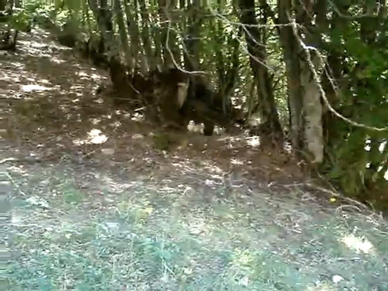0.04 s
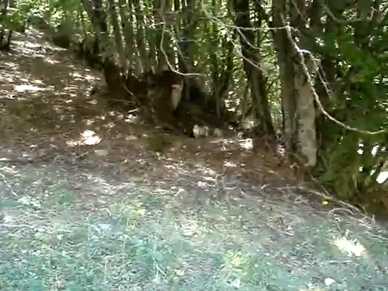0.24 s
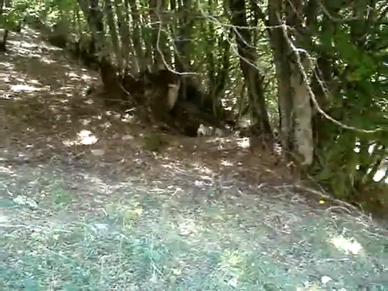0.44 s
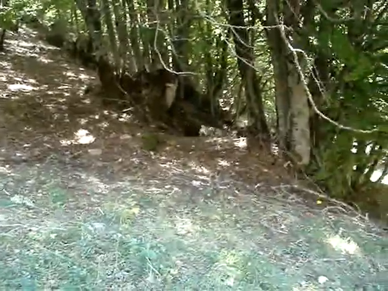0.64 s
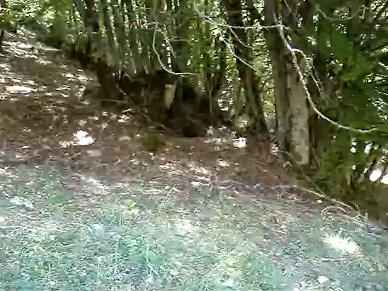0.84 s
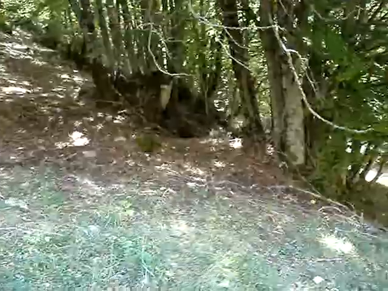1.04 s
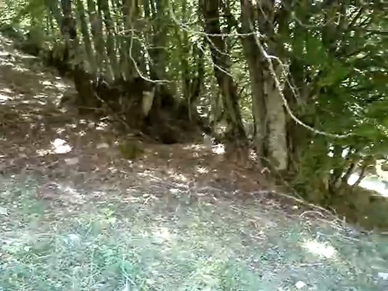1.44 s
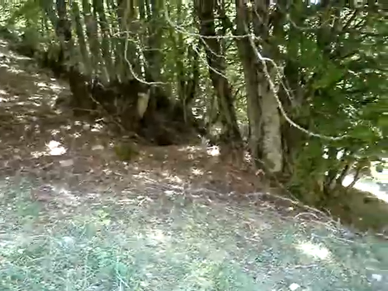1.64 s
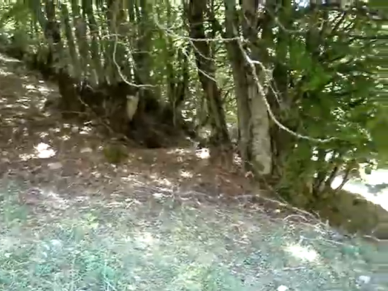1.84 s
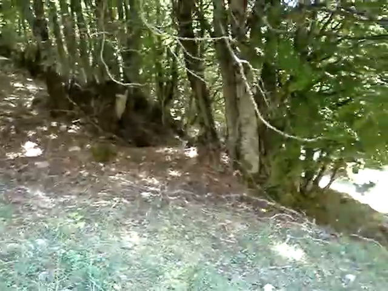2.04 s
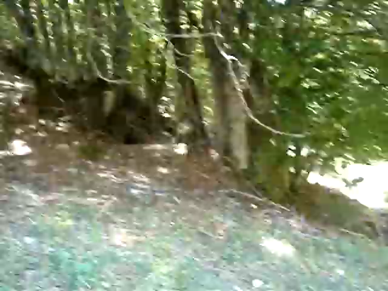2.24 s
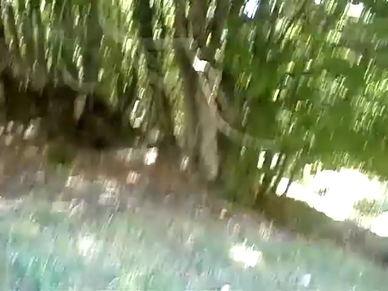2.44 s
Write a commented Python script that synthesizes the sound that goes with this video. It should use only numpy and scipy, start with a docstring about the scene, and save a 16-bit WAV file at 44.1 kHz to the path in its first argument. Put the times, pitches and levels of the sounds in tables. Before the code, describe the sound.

A steady rush like wind in the trees fills a wood's edge, with softly hissing leaves. Early on, small low gusts bump the microphone. They ease after one faint, distant bird chirp, and two light twig-like ticks sound nearby.

```python
"""A steady rush, like a stream or wind in the trees, and rustling leaves beside a wooded bank.
From 0.2 s a light breeze reaches the microphone: single eddies thump it over a low flutter.
At 0.8 s a far bird gives one thin rising note. The thumps weaken.
Two faint clicks sound close by, at 1.2 s and 2.3 s, the second with a soft low knock under it."""
import sys
import numpy as np
from scipy import signal
from scipy.fft import rfft, irfft, next_fast_len
from scipy.io import wavfile
from scipy.ndimage import uniform_filter1d, map_coordinates

SR = 44100
rng = np.random.default_rng(int(sys.argv[2]) if len(sys.argv) > 2 else 0)


def output_pcm(signal):
    """Save a mono or channel-first signal as 16-bit PCM at the path in sys.argv[1].

    Samples are clipped to [-1, 1] before scaling.
    """
    pcm = np.clip(np.atleast_2d(signal).T, -1, 1) * 32767
    wavfile.write(sys.argv[1], SR, np.round(pcm).astype(np.int16))


N = 110250


def amp(db):
    """dB to gain."""
    return 10 ** (np.asarray(db) / 20)


def unit(x):
    """x at rms 1."""
    return x / np.sqrt(np.mean(x ** 2) + 1e-20)


def along(points, hz):
    """Interpolate (frequency [Hz], value) points on a log axis."""
    knots_hz, values = np.transpose(points)
    return np.interp(np.log(hz + 1), np.log(knots_hz + 1), values)


def wobble(rate_hz):
    """Smooth random curve, rate_hz knots a second."""
    knots = rng.standard_normal(int(N * rate_hz / SR) + 4)
    return map_coordinates(knots, [np.arange(N) * rate_hz / SR])


def filtered(x, response):
    """Zero-phase filter with gain response(hz)."""
    size = next_fast_len(len(x) + SR // 2)
    return irfft(rfft(x, size) * response(np.fft.rfftfreq(size, 1 / SR)), size)[:len(x)]


def noise(spectrum, patchy_db):
    """Coloured noise, rms 1, with random gain patches in time and frequency."""
    bins = signal.stft(rng.standard_normal(N), nperseg=512)[2]
    patches = uniform_filter1d(rng.standard_normal(bins.shape), size=6, axis=0)
    patches = uniform_filter1d(patches, size=12, axis=1)
    patchy = signal.istft(bins * amp(patchy_db * unit(patches)), nperseg=512)[1][:N]
    return unit(filtered(patchy, lambda hz: amp(along(spectrum, hz))))


def rush():
    """Even, distant rushing, barely swelling."""
    # (frequency [Hz], relative density [dB])
    spectrum = [(15, -22), (30, -2), (65, -0.5), (150, -1.5), (300, -2.5), (410, -0.5), (570, -2.5),
                (720, -3), (850, -4), (1200, -6), (1600, -8), (2100, -9.5), (2450, -10.5), (3200, -11.5),
                (5400, -14), (7500, -17.5), (10000, -22)]
    level_db = -53.5 + 0.78 * wobble(rate_hz=3.3)
    return amp(level_db) * noise(spectrum, patchy_db=0.79)


def leaves():
    """Leaves touch in the breeze: a grainy hiss that swells and sinks."""
    # (time [s], level [dB])
    envelope = [(0, -63), (.19, -61.5), (.33, -59.5), (.39, -64.5), (.45, -60.5), (.6, -61), (.87, -61),
                (.97, -61.5), (1.02, -58.5), (1.14, -63.5), (1.31, -69.5), (1.5, -61), (1.6, -68.5),
                (1.85, -63.5), (2.04, -62.5), (2.12, -66), (2.36, -68.5), (2.46, -58)]
    # (frequency [Hz], relative density [dB])
    spectrum = [(800, -32), (2500, -3.5), (4200, -2), (7300, 1), (10000, -8)]
    level_db = np.interp(np.arange(N) / SR, *np.transpose(envelope))
    grain_db = 2.5 * wobble(rate_hz=420)  # uneven leaf contacts
    return amp(level_db) * unit(amp(grain_db) * noise(spectrum, patchy_db=1.5))


def bird():
    """One faint, far upward whistle."""
    start_s, length_s, from_hz, to_hz, peak_db = 0.828, 0.064, 3100, 4150, -61
    progress = np.clip((np.arange(N) / SR - start_s) / length_s, 0, 1)
    pitch_hz = from_hz + (to_hz - from_hz) * progress + 50 * wobble(rate_hz=300)
    envelope = np.sqrt(np.abs(np.sin(np.pi * progress)))
    return amp(peak_db) * envelope * np.sin(2 * np.pi * np.cumsum(pitch_hz) / SR)


def clicks():
    """Dry ticks, as of a twig: fast-dying woody modes, duller for a softer contact."""
    # (time [s], gain [dB], t60 scale [ratio], low-pass cutoff [Hz])
    contacts = [(1.237, -34, .25, 2920), (2.2974, -37.5, 0.66, 8000)]
    # (frequency [Hz], relative level [dB], unscaled t60 [s])
    twig_modes = [(1150, -3.5, 0.024), (1780, -4, 0.019), (2510, 2.5, 0.02), (2890, -3.5, 0.018),
                  (3960, -6, 0.016), (7200, -5, 0.0099)]
    rise_s = 0.00023
    out, t = np.zeros(N + SR), np.arange(SR // 10) / SR
    attack = 1 - np.exp(-t / rise_s)
    for start_s, gain_db, t60_scale, cutoff_hz in contacts:
        ring = sum(amp(mode_db - 60 * t / (t60_s * t60_scale)) * np.sin(2 * np.pi * hz * t)
                   for hz, mode_db, t60_s in twig_modes)
        lowpass = signal.butter(4, cutoff_hz, fs=SR, output="sos")
        out[round(start_s * SR):][:len(t)] += amp(gain_db) * signal.sosfilt(lowpass, ring * attack)
    return out[:N]


def flutter():
    """Small turbulence at the microphone comes and goes with the breeze."""
    # (time [s], level [dB])
    envelope = [(0, -77), (.17, -67), (.21, -45), (.27, -61), (.31, -48), (.385, -45), (.43, -57),
                (.5, -45.5), (.54, -50), (.58, -47), (.66, -54.5), (.72, -56), (.77, -43.5), (.89, -47.5),
                (.94, -54), (1.08, -49.5), (1.14, -62.5), (1.22, -50.5), (1.35, -55), (1.41, -67),
                (1.47, -59), (1.53, -79), (1.68, -79), (1.75, -54.5), (1.83, -56), (1.89, -60), (1.96, -53),
                (2.07, -58.5), (2.14, -70), (2.5, -66)]
    # (frequency [Hz], relative density [dB])
    spectrum = [(20, -11.5), (45, -2), (90, 1.5), (170, -2), (280, -9), (420, -25), (800, -35),
                (2000, -80.5)]
    level_db = np.interp(np.arange(N) / SR, *np.transpose(envelope))
    return amp(level_db) * noise(spectrum, patchy_db=2)


def eddies_and_knock():
    """Low thumps: pressure dips, then rises, inside a weak, wider counter-swing."""
    # (time [s], swing level [dB], half-width [ms])
    # Eddies at the microphone, except the last row: a soft low knock under the second click.
    thumps = [(0.2035, -31.5, 1.34), (0.302, -37, 1.65), (0.345, -23, 1.17), (.3495, -49, 3.4),
              (0.399, -32, 1.2), (0.4235, -25.5, 0.94), (0.4398, -19, 0.96), (0.4719, -31.5, 1.73),
              (.495, -33, 1.6), (0.57, -37.5, 3.2), (0.583, -35, 2.3), (0.6034, -29, 1.74),
              (.6635, -35.5, 1.52), (0.761, -36, 1.4), (0.8072, -27.5, 1.72), (.8429, -26.5, 1.11),
              (0.8484, -29, 2.1), (0.8957, -33.5, 0.99), (0.983, -43, 1.43), (1.0237, -37.5, 2.05),
              (1.102, -29, 1.9), (1.191, -36.5, 1.18), (1.2378, -39.5, 1.2), (1.279, -42.5, 1.4),
              (1.346, -44.5, 1.6), (1.463, -45.5, 2.8), (1.7863, -34, 1.48), (1.833, -47, 1.4),
              (1.944, -41.5, 1.97), (2.043, -40.5, 2.14), (2.058, -41, 1.9), (2.2938, -47, 2.4)]
    counter_height_ratio, counter_width_ratio = 0.16, 1.84
    t, out = np.arange(N) / SR, np.zeros(N)
    swing = lambda u: u * np.exp((1 - u * u) / 2)
    for centre_s, swing_db, half_width_ms in thumps:
        offset = (t - centre_s) * 1000 / half_width_ms
        counter_swing = counter_height_ratio * swing(offset / counter_width_ratio)
        out += amp(swing_db) * (swing(offset) - counter_swing)
    return out


def scene():
    """All sources at one microphone."""
    return (rush() + leaves() + flutter() + eddies_and_knock() + clicks() + bird())[None]


def record(dry):
    """Brick-wall band limit."""
    top_hz = 10100
    return np.array([filtered(channel, lambda hz: hz < top_hz) for channel in dry])


dry = scene()
out = record(dry)
output_pcm(out)
```